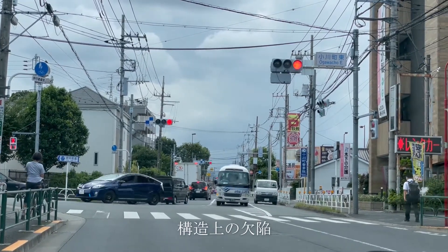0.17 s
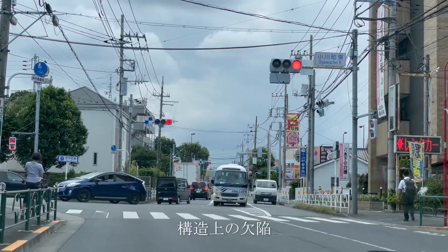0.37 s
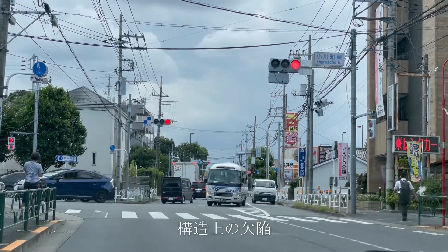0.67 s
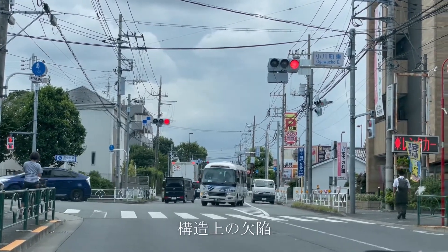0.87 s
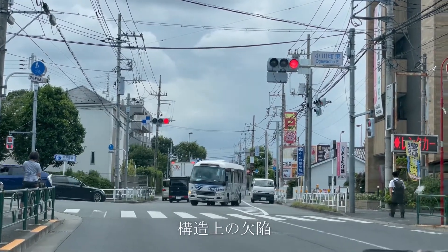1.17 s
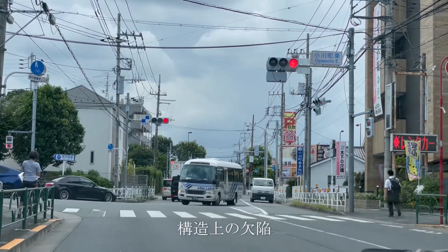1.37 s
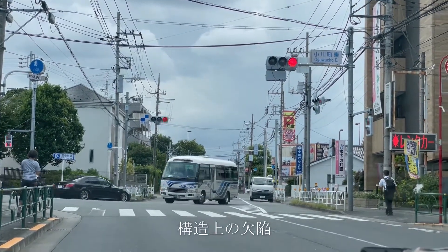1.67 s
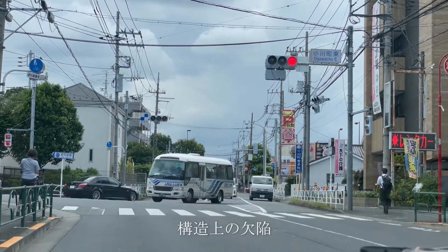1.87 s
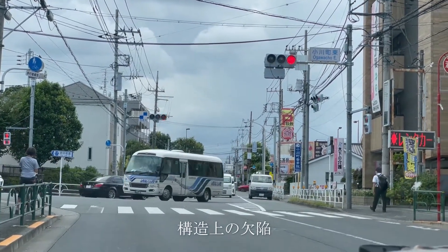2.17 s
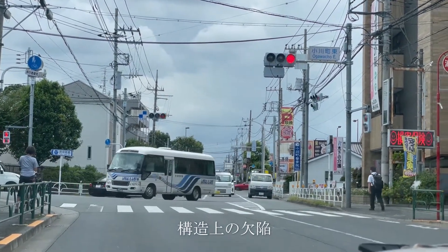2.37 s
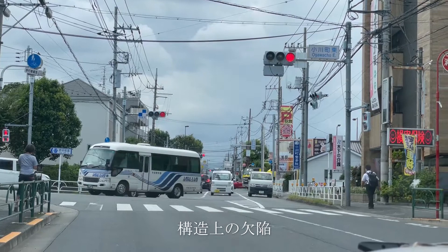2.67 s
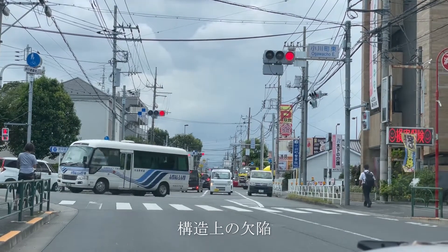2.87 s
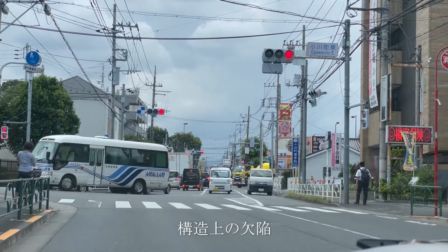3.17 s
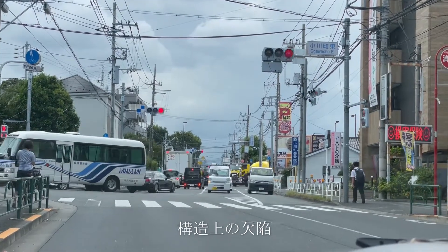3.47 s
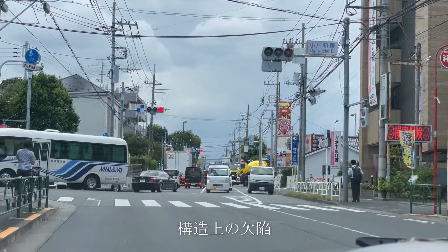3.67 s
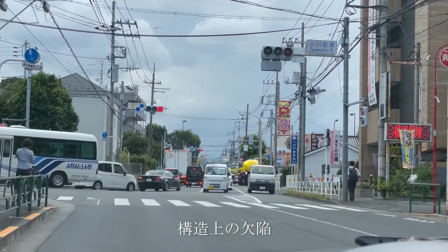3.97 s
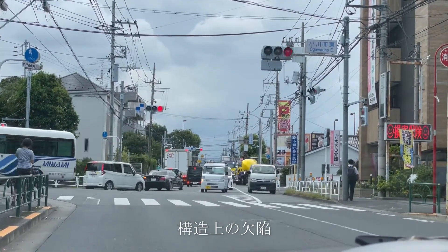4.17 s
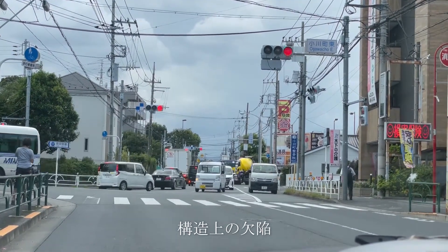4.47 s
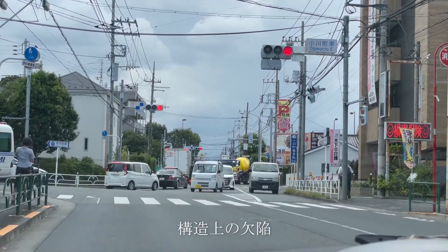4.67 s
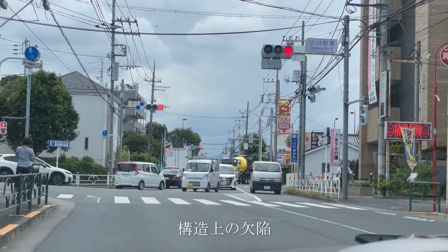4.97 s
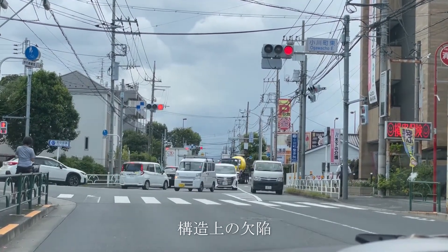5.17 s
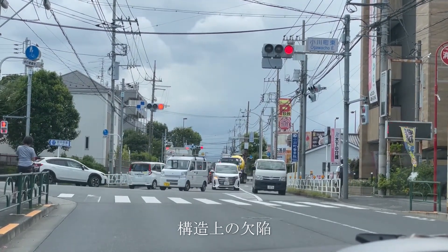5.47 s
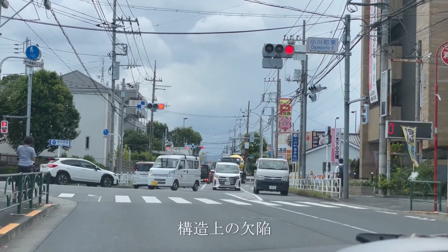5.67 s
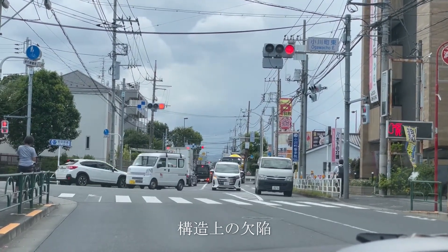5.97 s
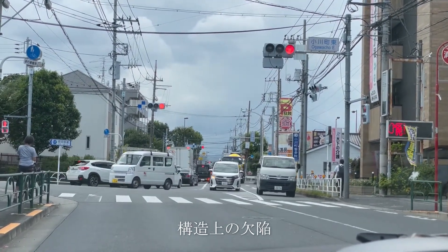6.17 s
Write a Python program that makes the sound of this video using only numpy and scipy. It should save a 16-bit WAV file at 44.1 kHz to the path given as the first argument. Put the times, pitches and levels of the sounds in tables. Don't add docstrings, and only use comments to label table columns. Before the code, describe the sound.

Muffled car cabin at a crossroads: throbbing idle and vent hiss swell steadily, two air puffs outside, fan hum sinking near the end.

```python
import sys
import numpy as np
from scipy import signal
from scipy.fft import rfft, irfft, next_fast_len
from scipy.io import wavfile
from scipy.ndimage import uniform_filter1d, map_coordinates

SR = 44100
rng = np.random.default_rng(int(sys.argv[2]) if len(sys.argv) > 2 else 0)


def volts(x):
    e = np.asarray(x, float) / 20
    return 10 ** e


def file_out(sig):
    cols = np.atleast_2d(sig).T
    lim = np.clip(cols, -1, 1)
    pcm = np.round(lim * 32767).astype(np.int16)
    wavfile.write(sys.argv[1], SR, pcm)


N = 278712

IDLE_HZ = 27.89
FAN_OFF_S = 5.36
BLADE_HZ, COAST_S = 316, 3.4
FAN_FADE_S = 0.4


def unit(x):
    return x / np.sqrt(np.mean(x ** 2) + 1e-20)


def along(points, hz):
    f, v = np.transpose(points)
    return np.interp(np.log(hz + 1), np.log(f + 1), v)


def curves(rows):
    s, *columns = np.transpose(rows)
    return [np.interp(np.arange(N) / SR, s, column) for column in columns]


def since(start_s):
    return np.maximum(np.arange(N) / SR - start_s, 0)


def bump(centre_s, length_s):
    return np.exp(-((np.arange(N) / SR - centre_s) / length_s) ** 2)


def wobble(rate):
    t = np.arange(0, N + 128, 128) / SR
    knots = rng.standard_normal(int(N * rate / SR) + 4)
    return np.interp(np.arange(N) / SR, t, map_coordinates(knots, [t * rate]))


def filtered(x, response):
    m = next_fast_len(x.shape[-1] + 8192)
    return irfft(rfft(x, m) * response(np.fft.rfftfreq(m, 1 / SR)), m)[..., :x.shape[-1]]


def rush(spectrum, patchy_db):
    # f/Hz, likeness (0-1)
    alike = [(30, 1.5), (80, 1.3), (150, .95), (400, 0.98), (720, 0.22), (900, 0.6), (1250, .52),
             (2150, 1.06), (3000, .87), (5200, 1), (5600, 0.8), (8000, 0.74), (8500, 0.77), (9800, 0.83),
             (12000, .68), (13100, .9)]
    z = signal.stft(rng.standard_normal((2, N)), nperseg=1024)[2]
    field = uniform_filter1d(rng.standard_normal(z.shape[1:]), size=10, axis=0)
    field = uniform_filter1d(field, size=8, axis=1)
    pair = signal.istft(z * volts(patchy_db * unit(field)), nperseg=1024)[1][:, :N]

    def share(hz):
        angle = np.arccos(np.clip(along(alike, hz), 0, 1)) / 2
        strength = volts(along(spectrum, hz)) * (hz < 1.6 * spectrum[-1][0])
        return strength * [np.cos(angle), np.sin(angle)]

    same, apart = filtered(pair, share)
    return unit(np.array([same + apart, same - apart]))


def engine():
    # multiple of the firing rate, level/dB
    order = [(1, -5), (2, 0), (3, -3.5), (4, -9.5), (5, -12), (6, -20.5), (7, -13), (8, -21)]
    # t/s, firing rate over idle/Hz, level/dB
    load = [
        (0, 0.92, 1),
        (.8, .1, -2),
        (2.2, -.1, -1),
        (3.8, -.15, 0.5),
        (4.3, 0.117, -.5),
        (5.3, -.1, -.5),
        (6.32, -0.097, -0.5),
    ]
    lift_hz, lift_s = 1.3, 0.1194
    surge_late_s, surge_length_s, surge_db = 0.31, 0.14, 4
    drift_hz, load_db = curves(load)
    rate_hz = IDLE_HZ + drift_hz + lift_hz * (1 - np.exp(-since(FAN_OFF_S) / lift_s))
    load_db = load_db + surge_db * bump(FAN_OFF_S + surge_late_s, surge_length_s)
    turns = np.cumsum(rate_hz * (1 + .003 * wobble(5))) / SR
    crank = 2 * np.pi * (turns - turns[-1] + .2)
    boom = 0
    for k, db in order:
        lag = np.pi - .6 * (k - 3) ** 2
        phase = k * crank - lag + .1 * k * wobble(8)
        boom = boom + volts(db + 1.8 * wobble(11)) * np.cos(phase)
    return volts(32.5 + load_db) * unit(boom)


def fan():
    tone_hz = BLADE_HZ * np.exp(-since(FAN_OFF_S) / COAST_S)
    dying = np.minimum(since(FAN_OFF_S) / FAN_FADE_S, 1)
    tone_db = 18 - 9 * dying
    flutter_db = (1 + 4 * dying) * wobble(10)
    tone = np.sqrt(2) * np.sin(2 * np.pi * np.cumsum(tone_hz + 0.8 * wobble(6)) / SR)
    return volts(tone_db + flutter_db) * tone * volts([[1.5], [-1.5]])


def fan_shake():
    blades = 7
    shaft_hz = BLADE_HZ / blades * np.exp(-since(FAN_OFF_S) / COAST_S)

    def hum(hz):
        return np.sqrt(2) * np.sin(2 * np.pi * np.cumsum(hz + .3 * wobble(5)) / SR)

    running = volts(-20 * np.minimum(since(FAN_OFF_S) / FAN_FADE_S, 1))
    shake = volts(24 + 1.5 * wobble(4) - 6 * since(FAN_OFF_S)) * hum(shaft_hz)
    beat = running * volts(21.5 + 3 * wobble(5)) * hum(shaft_hz + IDLE_HZ)
    return shake + beat


def whines():
    # f/Hz, width/Hz, level/dB
    belt_tones = [(487, 13, 6.5), (530, 10, 4.5), (615, 8, -3.5), (793, 11, -4), (884, 10, -.5)]
    t = np.arange(N) / SR
    running = volts(-10 * np.minimum(since(FAN_OFF_S) / FAN_FADE_S, 1))
    total = 0
    for hz, width, db in belt_tones:
        strength = volts(db + 4.04 * wobble(width))
        total = total + strength * np.sin(2 * np.pi * hz * t + 1.97 * wobble(width))
    return running * total


def bus():
    # t/s, firing rate/Hz, level/dB
    path = [
        (2.0, 32.9, -20),
        (2.6, 32.26, -4),
        (3.3, 31.05, -3.5),
        (3.8, 31.35, 0.5),
        (4.3, 32.56, -3.5),
        (5.0, 33.6, -6),
        (5.5, 34.24, -25),
    ]
    # multiple of the bus's firing rate, level/dB
    bus_order = [(2, 23.5), (3, 21), (4, 15), (5, 14)]
    rate_hz, near_db = curves(path)
    crank = 2 * np.pi * np.cumsum(rate_hz) / SR
    growl = 0
    for k, db in bus_order:
        strength = volts(db + 2.5 * wobble(5)) * np.sqrt(2)
        growl = growl + strength * np.sin(k * crank + .2 * k * wobble(5))
    return volts(near_db) * growl


def traffic():
    # t/s, level over the steady wash/dB, length/s
    passes = [
        (.9, .8, 0.46),
        (2.05, 1, 0.15),
        (2.8, 2.9, 0.07),
        (3.55, 0.3, 0.16),
        (4.3, 1.4, 0.43),
        (5.3, 1.5, 0.37),
    ]
    # f/Hz, level per Hz/dB
    body_spectrum = [(14, -42), (24, -18), (36, -16.5), (45, -5), (60, -5.5), (73, -1.5), (98, -10),
                     (130, -10), (155, -11), (205, -12.5), (240, -17), (330, -21.5), (520, -27), (640, -51)]
    # f/Hz, level per Hz/dB
    street_spectrum = [(150, -25), (300, -10), (500, 1), (700, -7.5), (1000, -8), (1500, -12),
                       (2100, -16.5), (2800, -18), (3200, -27.5), (5000, -37), (8000, -70)]
    passing_db = sum(db * bump(s, length) for s, db, length in passes)
    body_db = 28 + 0.67 * passing_db
    street_db = 13 + 0.4 * since(0) + passing_db
    swell = wobble(3.01)
    body = volts(body_db + .4 * swell) * rush(body_spectrum, patchy_db=.7)
    street = volts(street_db + .5 * swell) * rush(street_spectrum, patchy_db=1.0)
    return body + street


def air():
    # t/s, level/dB, length/s
    puff_times = [
        (2.33, 0, .04),
        (2.84, 3, .045),
    ]
    # f/Hz, level per Hz/dB
    vent_spectrum = [(1500, -24), (2900, -0.5), (4000, -3.5), (5500, -4.5), (7000, -8), (8100, -6),
                     (10000, -10), (12200, -11.5), (13200, -17), (14300, -27), (15100, -35), (15300, -120)]
    # f/Hz, level per Hz/dB
    valve_spectrum = [(2000, -22), (5000, -3), (8000, 0), (11000, -4), (14000, -14), (15200, -60)]
    t = np.arange(N) / SR
    puffs = 0
    for s, db, length in puff_times:
        opening = np.clip((t - s) / 0.0075, 0, 1)
        emptying = np.exp(-(np.maximum(t - s, 0) / length) ** 2)
        puffs = puffs + volts(db) * opening * emptying
    vents = volts(1.5 + 0.43 * wobble(12)) * rush(vent_spectrum, patchy_db=0.3)
    return vents + puffs * rush(valve_spectrum, patchy_db=4.0)


def scene():
    return engine() + fan() + whines() + traffic() + air() + fan_shake() + bus()


def fader():
    full_s, jump_s, jump_length_s, jump_db = 5.34, 0.91, 0.05, 4
    rise = np.interp(since(0), [0, full_s], volts(np.array([-82, -70])))
    return rise * volts(jump_db * np.minimum(since(jump_s) / jump_length_s, 1))


def starved(x, gaps):
    hz, _, z = signal.stft(x, SR, nperseg=2048)
    for low, high, share, drift in gaps:
        need = uniform_filter1d(rng.standard_normal(z.shape[1]), size=3)
        need = need - drift * np.linspace(-1, 1, z.shape[1])
        z[(hz >= low) & (hz < high)] *= need > np.quantile(need, share)
    return signal.istft(z, SR, nperseg=2048)[1][:N]


def roll_off(x):
    return signal.sosfilt(signal.butter(12, 15100, fs=SR, output="sos"), x)


def record(dry):
    # f/Hz, phase/radians
    lead = [(40, 0), (400, -0.5), (1030, 1.09), (1800, 0.2), (2800, 0.46), (5100, 0.74), (5770, -2),
            (6900, 0), (7550, -2.5), (8000, -2.5), (8400, -np.pi), (8850, -np.pi), (10200, -3.9),
            (12000, -5.5), (13000, -2 * np.pi)]
    # f/Hz, level/dB
    lean = [(30, -0.7), (70, 0.1), (140, 1), (250, 5), (420, 0.7), (700, 0), (870, 3.5), (1100, 0.5),
            (1500, 3), (2200, 0), (15000, 0)]
    # low f/Hz, high f/Hz, share of time (0-1), drift to the loud end
    mid_gaps = [(8280, 8950, 1, 0), (8950, 9250, .28, .7), (9250, 9600, .09, .7), (13800, 14300, .22, .2),
                (14300, 14700, .6, .3), (14700, 15100, .85, .3)]
    side_gaps = [(2070, 2330, .25, 0), (5330, 5450, .4, 0), (12050, 12400, .05, 0), (12400, 12750, .3, 0),
                 (12750, 13100, .7, 0), (13100, 22050, 1, 0)]
    running = np.pad(dry * fader(), ((0, 0), (0, 4096)), "reflect")
    sides = np.array([[.5], [-.5]])

    def ports(hz):
        return volts(sides * along(lean, hz)) * np.exp(1j * sides * along(lead, hz))

    left, right = filtered(running, ports)
    mid = starved((left + right) / 2, mid_gaps)
    side = starved((left - right) / 2, side_gaps)
    return roll_off(np.array([mid + side, mid - side]))


dry = scene()
out = record(dry)
file_out(out)
```